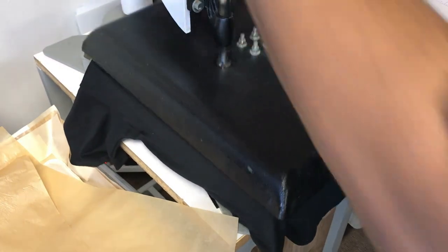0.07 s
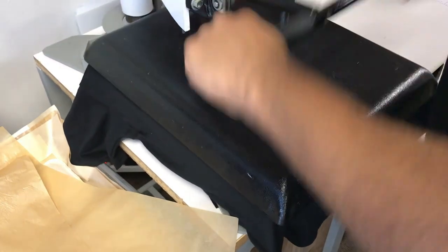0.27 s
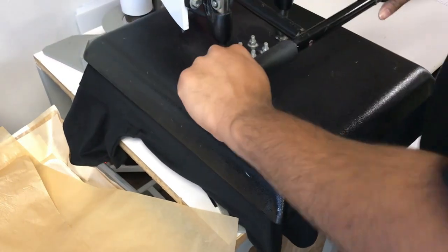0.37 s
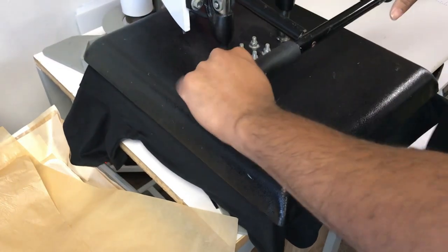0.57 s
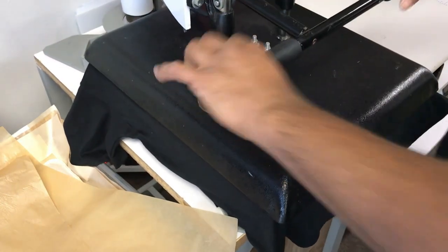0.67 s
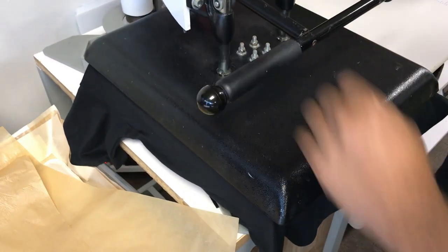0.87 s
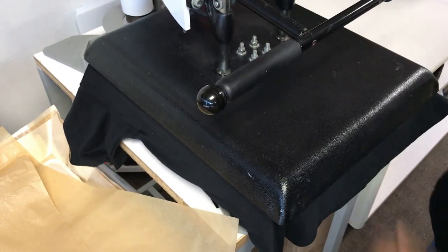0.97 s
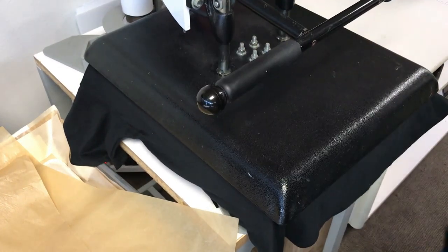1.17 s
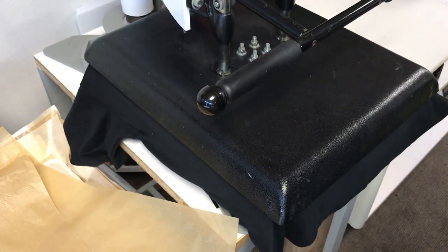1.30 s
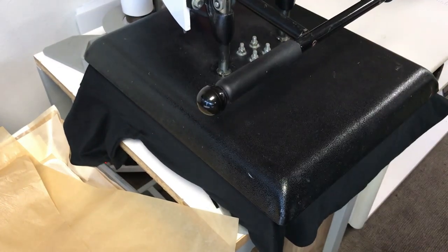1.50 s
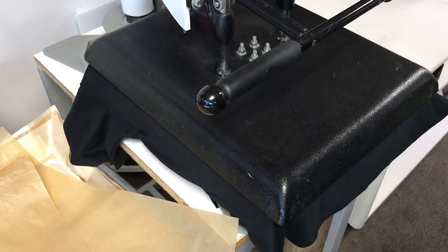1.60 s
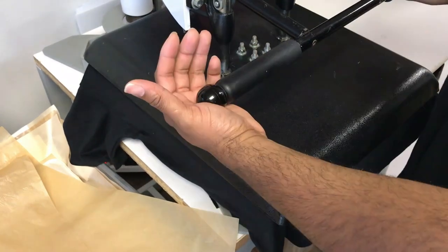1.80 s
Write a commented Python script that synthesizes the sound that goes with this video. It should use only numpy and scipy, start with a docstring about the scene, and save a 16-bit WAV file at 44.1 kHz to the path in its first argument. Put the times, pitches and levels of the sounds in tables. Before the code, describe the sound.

A manual heat press is pulled shut: clicks, swelling clatter, then a loud metallic clunk locks it

```python
"""A quiet workshop, close up: a manual heat press is pulled shut.
The steel linkage chatters in swelling click bursts that ring the handle, lever arm and toggle;
the upper platen thuds on its pad as rounded pushes ring low modes; the toggle snaps over and locks.
The frame rings on, sharp ticks stand out, loose parts settle in late chatter and something rustles in dry crackles.
Shaped noise gives the faint room hum and the short reflections."""
import sys
import numpy as np
from scipy import signal
from scipy.io import wavfile

SR = 44100
rng = np.random.default_rng(int(sys.argv[2]) if len(sys.argv) > 2 else 0)


def generate_wav(sig):
    """Save sig (samples, or channels by samples) to the path in sys.argv[1] as 16-bit PCM at SR."""
    pcm = np.round(np.clip(np.atleast_2d(sig).T, -1, 1) * 32767).astype(np.int16)
    wavfile.write(sys.argv[1], SR, pcm)


def volts_from_db(level):
    """Convert decibel levels to linear amplitude ratios."""
    exponent = np.asarray(level, float) / 20
    return 10 ** exponent


N = 81585  # length in samples
BAND_EDGES_HZ = 25 * 2 ** np.arange(0, 9.6, .5)  # half-octave bands of room noise and reflections
TOP_HZ = 14300  # upper end of the treble


def rms_one(x):
    """Scales a sound to an rms of 1."""
    return x / np.sqrt(np.mean(x ** 2) + 1e-20)


def at_hz(points, hz):
    """Reads a table on a log-frequency axis."""
    table_hz, values = np.transpose(points)
    return np.interp(np.log(hz), np.log(table_hz), values)


def band(x, low, high):
    """Band-pass with gentle slopes."""
    sos = signal.butter(2, [low, min(high, 20000.)], "band", fs=SR, output="sos")
    return signal.sosfilt(sos, x)


def drift(rate):
    """Slow chance: straight lines between normal draws of spread 1, rate draws a second."""
    knots = rng.standard_normal(200)
    return np.interp(np.arange(N) / SR * rate, np.arange(200), knots)


def ring(x, hz, t60):
    """A two-pole resonance: a unit click sets off a sine of height 1 that dies by 60 dB in t60."""
    radius = volts_from_db(-60 / (t60 * SR))
    angle = 2 * np.pi * hz / SR
    return signal.lfilter([0, np.sin(angle)], [1, -2 * radius * np.cos(angle), radius ** 2], x + 1e-18)


def place(parts, starts):
    """Lays short sounds out in time."""
    out = np.zeros(N + SR)
    for part, start in zip(parts, starts):
        i = int(max(start, 0) * SR)
        out[i:i + len(part)] += part
    return out[:N]


def chatter(rows):
    """Each row is a dense run of uneven clicks that swells and dies, coloured around its centre."""
    clicks_per_s, spread_db, half_width_octaves = 9000, 1, 1.26
    t = np.arange(9000) / SR
    parts = []
    for _, db, rise, t60, hz in rows:
        hits = rng.random(t.size) < clicks_per_s / SR
        signs = rng.choice([-1, 1], t.size)
        strengths = volts_from_db(spread_db * np.minimum(rng.exponential(1, t.size), 3))
        clicks = hits * signs * strengths
        low, high = hz / 2 ** half_width_octaves, hz * 2 ** half_width_octaves
        coloured = rms_one(band(band(clicks, low, high), low, high))
        swell = 1 - np.exp(-t / max(rise, 1e-4))
        parts.append(volts_from_db(db) * coloured * swell * volts_from_db(-60 * t / t60))
    return parts


def struck(parts, starts, modes, twin=0.):
    """Every blow drives every mode with a strength of its own; twin modes make the ring beat."""
    strength_spread_db = 2.5
    modes = list(modes) + [(hz * (1 + twin), db, t60) for hz, db, t60 in modes if twin]
    strengths = volts_from_db(strength_spread_db * rng.standard_normal((len(parts), len(modes))))
    out = 0
    for k, (hz, db, t60) in enumerate(modes):
        blows = [part * strength for part, strength in zip(parts, strengths[:, k])]
        out = out + volts_from_db(db) * ring(place(blows, starts), hz, t60)
    return out


def hum():
    """Banded room noise; each band flickers, the upper ones also follow a slow level."""
    # colour of the room noise: hz, relative_level_db (per Hz)
    noise_colour = [(15, -37), (30, -18.5), (69, -4), (230, -9.5), (394, -18.5), (560, -12.5), (952, -16.5),
                    (13500, -34), (15000, -47)]
    # slow course of the upper bands, used about its mean: time_s, level_db
    upper_course = [(0.75, -64.5), (0.822, -71), (1.206, -69), (1.416, -71.5), (1.546, -68), (1.667, -74.5),
                    (1.85, -77)]
    level_db, flicker_db = -60.5, -1
    white, out = rng.standard_normal((2, N)), 0
    time_s, course_db = np.transpose(upper_course)
    slow_db = np.interp(np.arange(N) / SR, time_s, course_db - course_db.mean())
    for k, (low, high) in enumerate(zip(BAND_EDGES_HZ, BAND_EDGES_HZ[1:])):
        colour_db = at_hz(noise_colour, min(np.sqrt(low * high), TOP_HZ - 800))
        gain_db = colour_db + flicker_db * drift(12) + slow_db * (low > 700)
        out = out + band(white[k % 2], low, high) * volts_from_db(gain_db)
    return volts_from_db(level_db) * rms_one(out)


def tones():
    """Wavering hum tones: noise through narrow resonances."""
    # tones in the hum: pitch_hz, width_hz, level_db (rms)
    hum_tones = [(57, 3.1, -67), (135, 18, -69), (290, 14, -69), (501.5, 36, -70)]
    out = 0
    for hz, width, db in hum_tones:
        t60 = np.log(1000) / (np.pi * width)
        tone = ring(rng.standard_normal(N + SR), hz, t60)[SR:]  # the build-up is left out
        out = out + volts_from_db(db) * rms_one(tone)
    return out


def room(x):
    """Reflections as noise that dies band by band."""
    # decay of the reflections: hz, t60_s
    room_decay = [(60, 1), (500, 0.082), (2000, 0.25), (4000, .3), (12000, 0.073)]
    delay_s = 0.003
    t = np.arange(SR) / SR
    white, tail = rng.standard_normal((2, SR)), 0
    for k, (low, high) in enumerate(zip(BAND_EDGES_HZ, BAND_EDGES_HZ[1:])):
        tail = tail + band(white[k % 2], low, high) * volts_from_db(-60 * t / at_hz(room_decay, low))
    tail = tail * (t > delay_s)
    return signal.fftconvolve(x, tail / np.sqrt(np.sum(tail ** 2)))[:N]


def rustle():
    """Dry crackles of dense clicks, which also drive a thin high ring."""
    # crackles: start_s, level_db (before swell and decay), rise_s, t60_s, centre_hz
    crackle_rows = [(1.153, -47.5, 0.016, 0.19, 1600), (1.177, -37.5, 0.012, 0.093, 2420),
                    (1.18, -51.5, 0.007, 0.17, 14000), (1.1887, -44, 0.0023, 0.022, 3540),
                    (1.2058, -43.5, 0.00075, 0.028, 3236), (1.213, -48, 0.0023, 0.054, 1800),
                    (1.37, -58.5, 0.0089, 0.21, 3990), (1.66, -59, 0.021, .2, 1500),
                    (1.705, -65, .001, 0.033, 1296)]
    sparkle_hz, sparkle_db, sparkle_t60_s = 13200, -20, .01
    dry = place(chatter(crackle_rows), [row[0] for row in crackle_rows])
    return dry + volts_from_db(sparkle_db) * ring(dry, sparkle_hz, sparkle_t60_s)


def frame():
    """The frame rings on after the lock: one click sets off its modes."""
    # modes of the frame: pitch_hz, level_db, t60_s
    frame_modes = [(206, -28, .55), (534, -45, 1.4)]
    click = place([np.ones(1)], [.425])
    return sum(volts_from_db(db) * ring(click, hz, t60) for hz, db, t60 in frame_modes)


def ticks():
    """A lone sharp tick is a click whose ring dies within a few cycles."""
    # ticks: start_s, level_db (before decay), pitch_hz
    tick_rows = [(0.027, -14, 2870), (0.3972, -4, 8000), (0.4101, -6, 7530), (.4165, 3.5, 3050),
                 (0.6974, -29, 1997), (.6968, -50, 4070), (1.159, -43, 4570), (1.187, -34, 495),
                 (1.2065, -29, 3500)]
    cycles = 7  # until 60 dB down
    out = 0
    for start, db, hz in tick_rows:
        out = out - volts_from_db(db) * ring(place([np.ones(1)], [start]), hz, cycles / hz)
    return out


def platen():
    """A soft blow is a short rounded push that rings the low modes of platen and bench."""
    # soft blows: start_s, relative_level_db (peak of the push), contact_cutoff_hz
    thud_rows = [(0.036, -38, 602.4), (.048, -34, 598.5), (.063, -32, 607), (.236, -26, 397.7),
                 (0.2885, -12, 807), (0.294, -20.5, 303.6), (0.301, -12.5, 310.3), (0.338, -34.5, 300),
                 (0.418, -13, 705.4), (0.432, -11.5, 400), (0.444, -18.5, 395)]
    # modes of platen and bench: pitch_hz, relative_level_db, t60_s
    bench_modes = [(55, -20.5, 0.56), (142.3, -12, .08), (165, -2, 0.11), (208, -1, 0.09), (292.5, -1, .09),
                   (398, 0, .13), (485, 2, 0.09), (600, 0, 0.05)]
    push_db = 2  # gain of the bare push heard beside the modes
    t = np.arange(2000) / SR
    starts, pushes = [row[0] for row in thud_rows], []
    for _, db, hz in thud_rows:
        phase = 2 * np.pi * hz * t
        pushes.append(-volts_from_db(db) * phase * np.exp(1 - phase))
    # the modes get pushes of equal area, weighted by their peaks
    drives = [push / push.sum() * push.min() for push in pushes]
    bare = band(place(pushes, starts), 90, 4100)
    return volts_from_db(push_db) * bare + .5 * struck(drives, starts, bench_modes)


def linkage():
    """Metal contacts chatter, heard directly and through the modes of the part that is struck."""
    # contacts: start_s, level_db (before swell and decay), rise_s, t60_s, centre_hz
    contact_rows = [(.001, -44.5, 0.00033, 0.29, 9010), (0, -39.5, 0.00047, 0.33, 500),
                    (0.025, -31.5, .0003, 0.059, 3740), (.027, -21.5, 0.0093, 0.12, 350),
                    (0.043, -31, 0.0024, 0.071, 930), (0.061, -34.5, .003, 0.13, 2200),
                    (.066, -31, 0.0028, 0.13, 350), (0.0932, -33, 0.00033, 0.033, 8014),
                    (0.112, -40.5, .01, 0.31, 300), (0.1204, -45.5, 0.0018, 0.14, 8000),
                    (0.169, -36, .03, 1, 350), (0.173, -54.5, .02, 1, 3020),
                    (0.225, -32.5, 0.008, 0.16, 1185), (0.2402, -19.5, 0.0035, 0.067, 6000),
                    (.246, -23, 0.001, 0.2, 833.4), (0.2497, -17, 0.0005, 0.06, 4600),
                    (.259, -20, .001, 0.078, 4530), (.268, -21, 0.01, 0.15, 350),
                    (0.271, -20.5, 0.0012, 0.06, 5500), (0.281, -26, 0.002, 0.068, 3800),
                    (0.292, -30.5, .002, 0.066, 3740), (0.3807, -7.5, 0.00042, 0.067, 5990),
                    (0.382, -26, .002, 0.5, 700), (0.391, -11, .001, 0.083, 4000),
                    (0.399, -11.5, 0.0011, 0.083, 7000), (0.4074, -15, 0.001, 0.13, 9000),
                    (0.4124, -5, 0.0014, 0.062, 3800), (.417, -10.5, 0.0022, 0.11, 695),
                    (0.423, -10.5, 0.0015, 0.038, 3000), (.47, -35.5, .02, 0.51, 312),
                    (0.593, -47.5, .002, 0.11, 2000), (.648, -36, 0.0015, 0.092, 744),
                    (0.6945, -41.5, 0.0006, 0.084, 1800), (0.701, -41.5, .002, 0.15, 300)]
    # All modes: pitch_hz, relative_level_db, t60_s
    # handle, struck as the hand takes it
    handle_modes = [(1432, 0, .07), (2420, 12, .04), (3112, 8, .05), (10000, 13, .07)]
    # lever arm, struck while it swings down
    lever_modes = [(1106, -5, .024), (1290, -14, .3), (2600, 0, .04), (3180, 13, .06), (3440, 15, .045),
                   (4100, 7, .03), (4727, 7, .035), (5450, 9, .035), (6170, 6, .03), (8500, 5, .03),
                   (9950, 7, .04), (13900, 6, .04)]
    # toggle, struck from the moment it snaps over
    toggle_modes = [(1292, -5.5, 0.15), (1776, -5.5, 0.049), (2722, 0.5, 0.053), (2927, -2.5, 0.16),
                    (4493, -9, 0.13), (5640, -3, 0.047), (5850, -4, 0.089), (8300, -7.5, 0.054),
                    (9830, -6, 0.15), (11840, -2.5, .07)]
    swing_s, snap_s = .09, .375
    ring_db, twin_share = -44, .025  # every mode has a twin this share higher
    parts, starts = chatter(contact_rows), [row[0] for row in contact_rows]
    swing = sum(s < swing_s for s in starts)
    snap = sum(s < snap_s for s in starts)
    rings = struck(parts[:swing], starts[:swing], handle_modes, twin_share)
    rings = rings + struck(parts[swing:snap], starts[swing:snap], lever_modes, twin_share)
    rings = rings + struck(parts[snap:], starts[snap:], toggle_modes, twin_share)
    return place(parts, starts) + volts_from_db(ring_db) * rings


def scene():
    """The press in its room, thinned in the bass, over the hum; the same in both channels."""
    room_db, mic_low_hz = -16, 116
    press = linkage() + platen() + frame() + ticks() + rustle()
    press = press + volts_from_db(room_db) * room(press)
    low_cut = signal.butter(1, mic_low_hz, "high", fs=SR, output="sos")
    press = signal.sosfilt(low_cut, press)
    return np.tile(press + hum() + tones(), (2, 1))


def spread_treble(x):
    """The treble differs a little between the channels, in patches: noise-modulated bands, opposite in sign."""
    side_db, side_low_hz, patch_db = -12, 5800, 7.5
    edges_hz = np.geomspace(side_low_hz, TOP_HZ, 5)
    side = 0
    for low, high in zip(edges_hz, edges_hz[1:]):
        wobble = rms_one(band(rng.standard_normal(N), 30, 400))
        patch = band(band(x[0], low, high) * wobble, low, high)
        side = side + patch * volts_from_db(patch_db * drift(25))
    return x + volts_from_db(side_db) * side * [[1], [-1]]


def roll_off(x):
    """The treble ends steeply here."""
    return signal.sosfilt(signal.butter(12, 15440, fs=SR, output="sos"), x)


def record(dry):
    """Peaks are rounded, the treble is spread a little, the top is cut."""
    rounded = .86 * np.tanh(dry / .86)
    wide = spread_treble(rounded)
    top_cut = signal.cheby2(14, 50, TOP_HZ + 500, fs=SR, output="sos")
    mix = signal.sosfilt(top_cut, wide)
    return roll_off(mix)


dry = scene()
out = record(dry)
generate_wav(out)
```